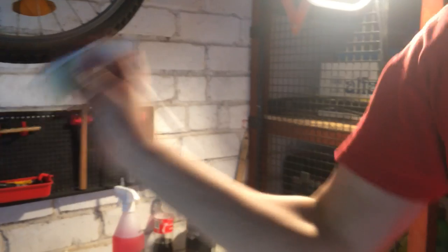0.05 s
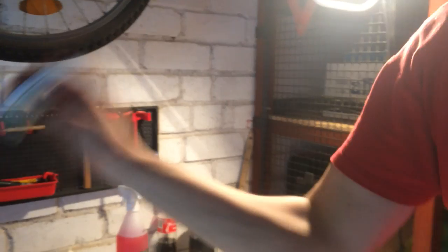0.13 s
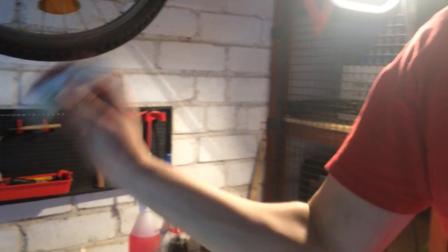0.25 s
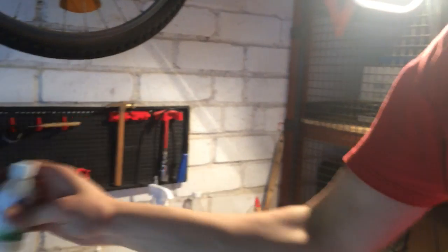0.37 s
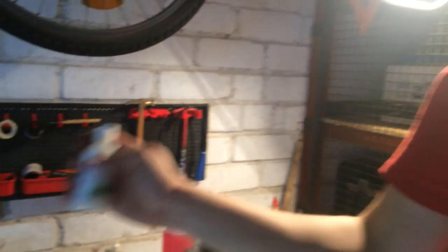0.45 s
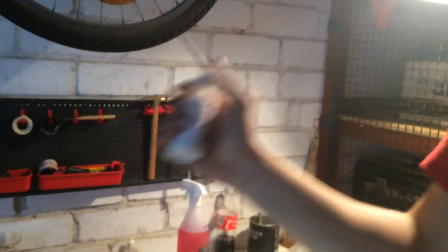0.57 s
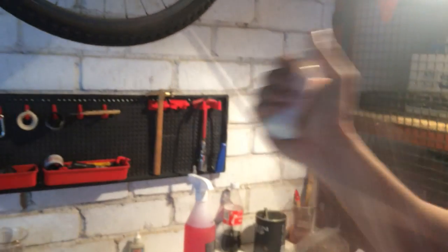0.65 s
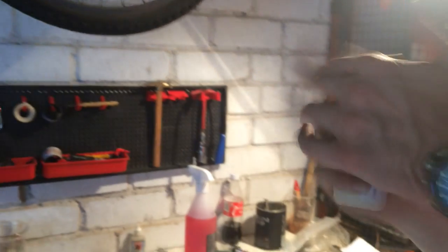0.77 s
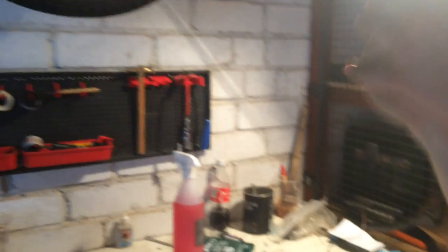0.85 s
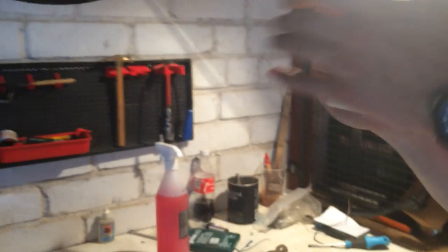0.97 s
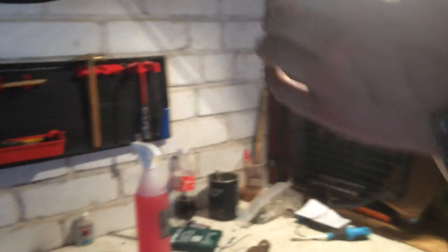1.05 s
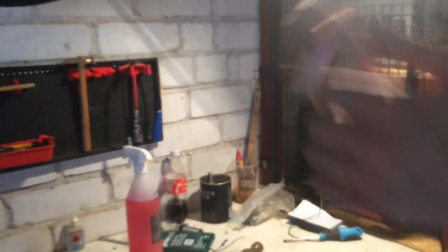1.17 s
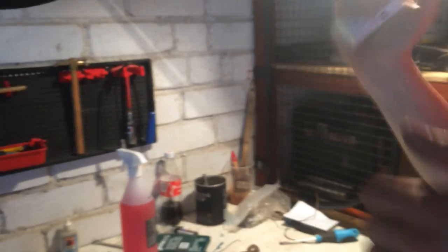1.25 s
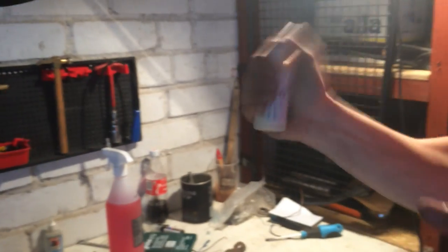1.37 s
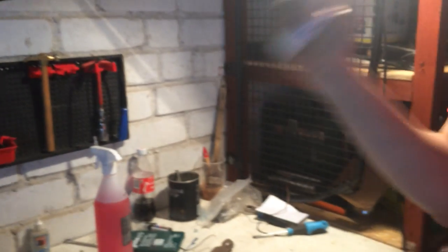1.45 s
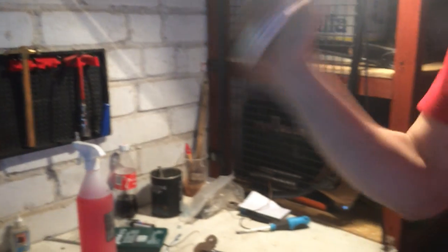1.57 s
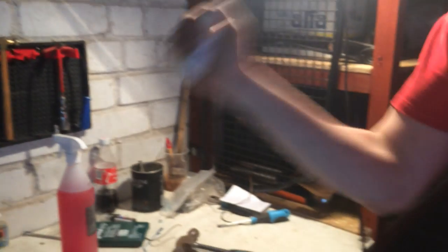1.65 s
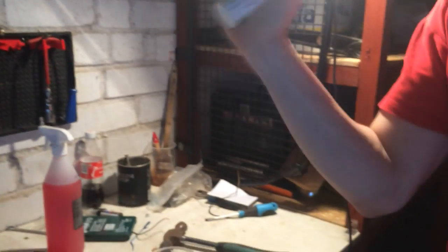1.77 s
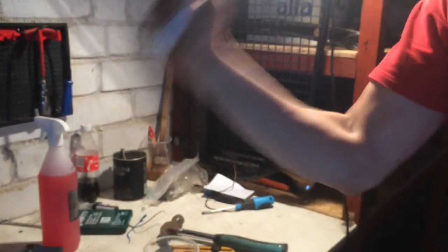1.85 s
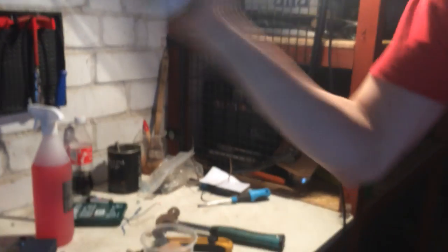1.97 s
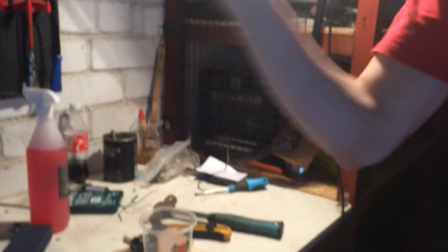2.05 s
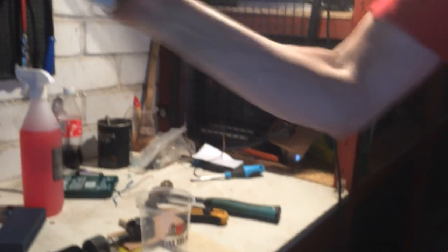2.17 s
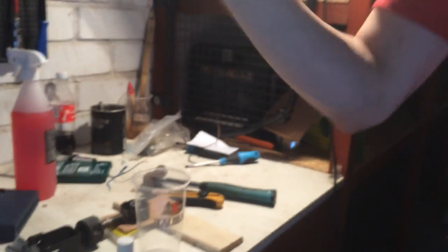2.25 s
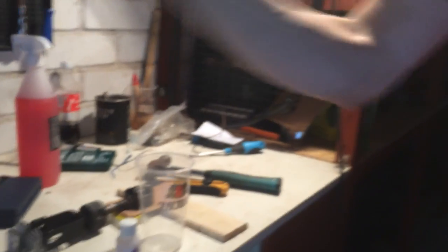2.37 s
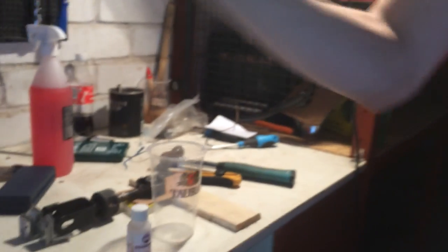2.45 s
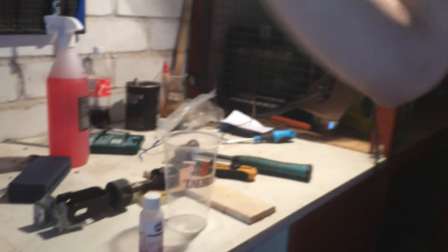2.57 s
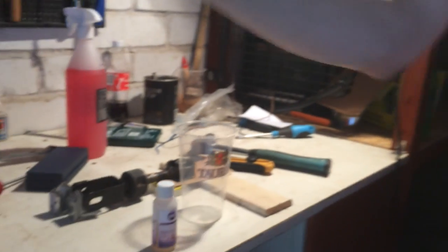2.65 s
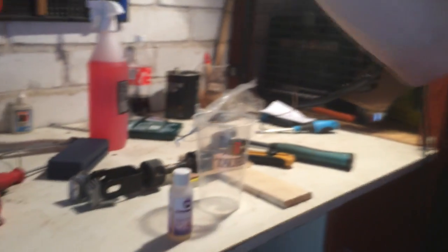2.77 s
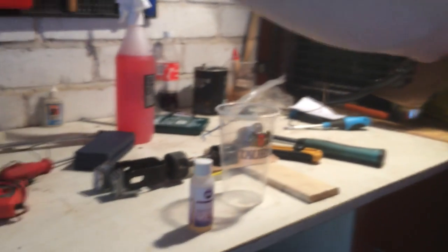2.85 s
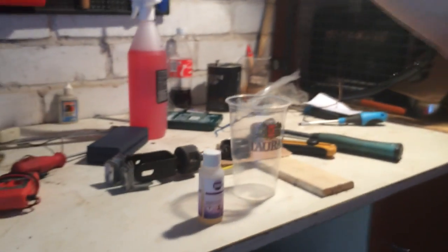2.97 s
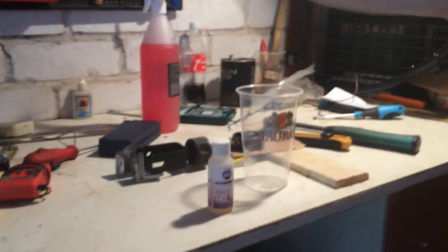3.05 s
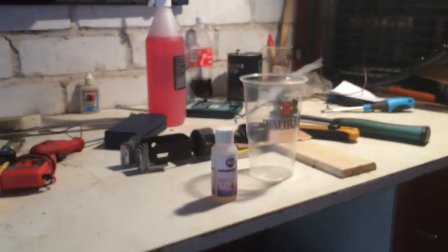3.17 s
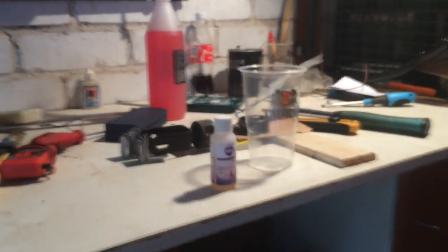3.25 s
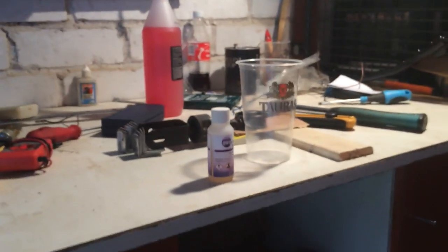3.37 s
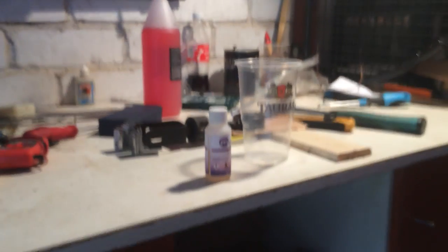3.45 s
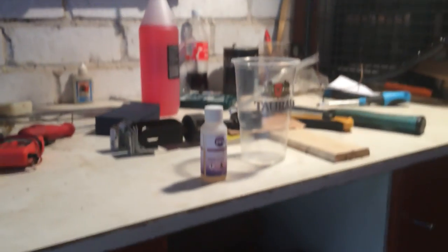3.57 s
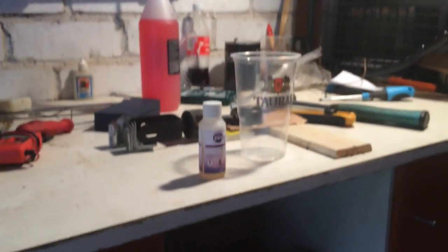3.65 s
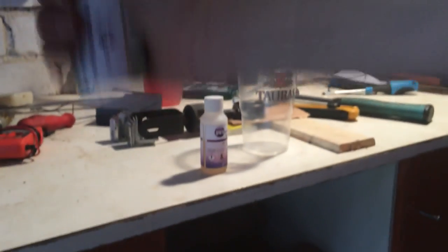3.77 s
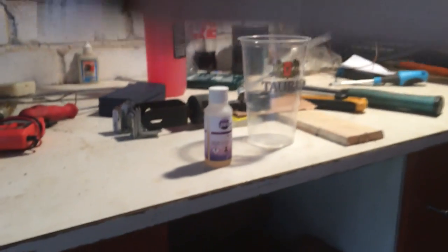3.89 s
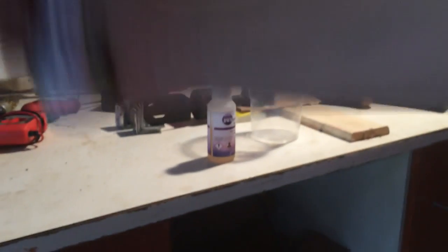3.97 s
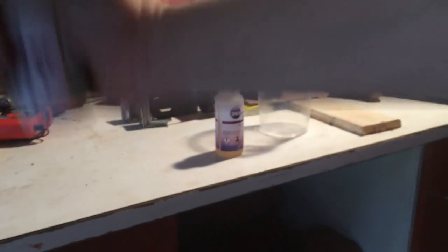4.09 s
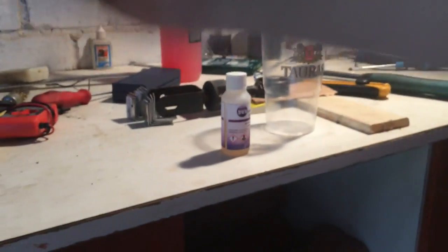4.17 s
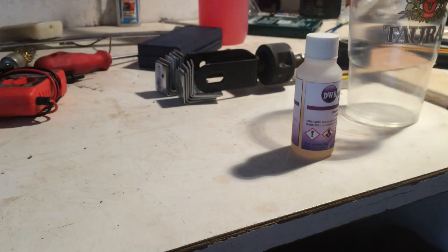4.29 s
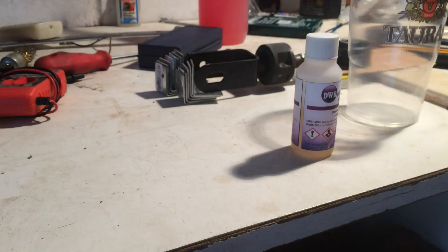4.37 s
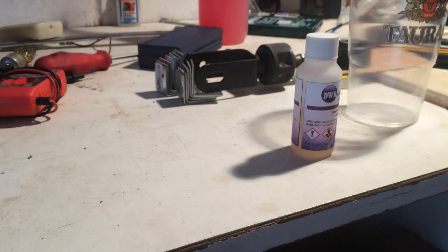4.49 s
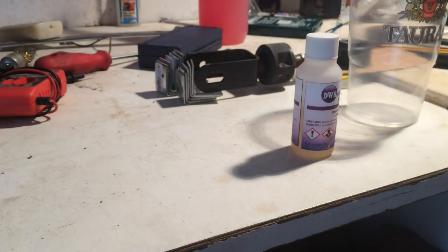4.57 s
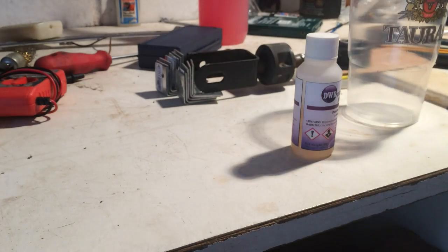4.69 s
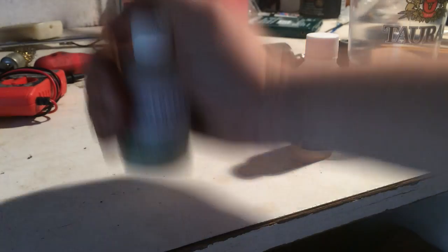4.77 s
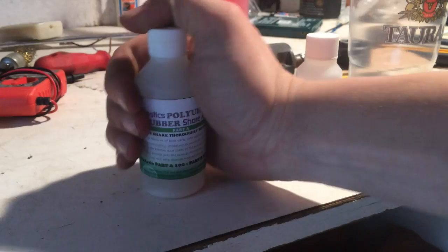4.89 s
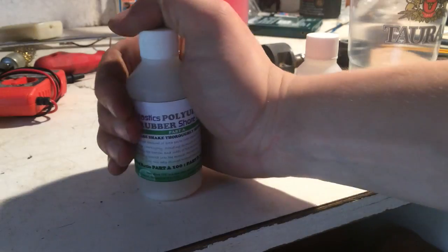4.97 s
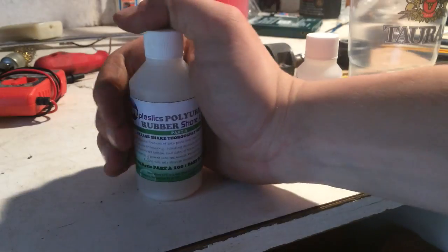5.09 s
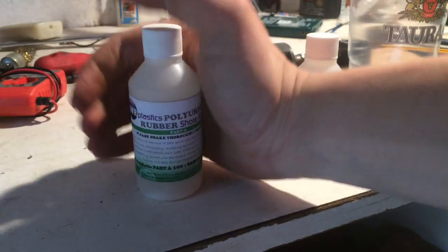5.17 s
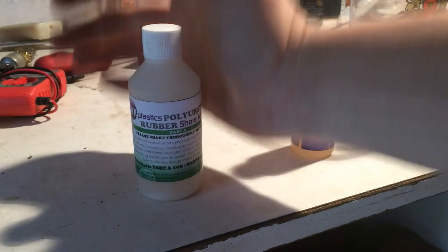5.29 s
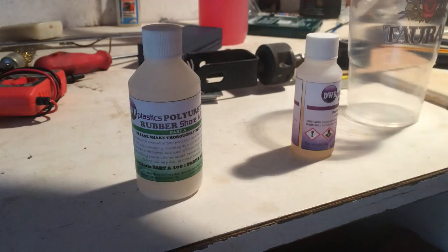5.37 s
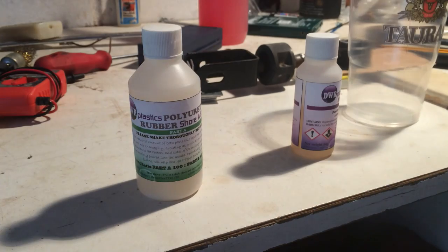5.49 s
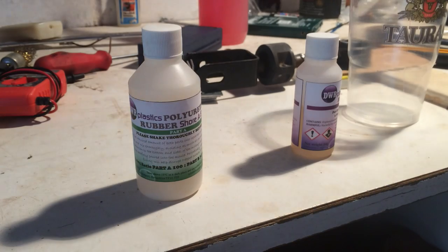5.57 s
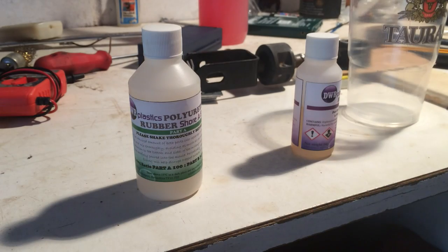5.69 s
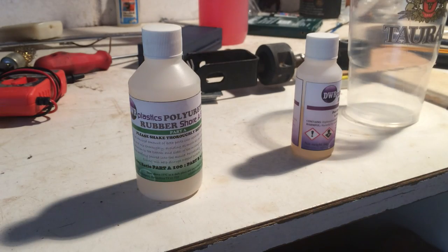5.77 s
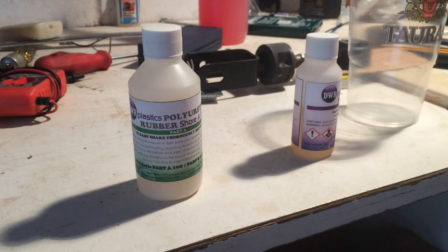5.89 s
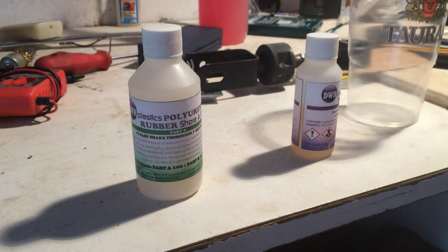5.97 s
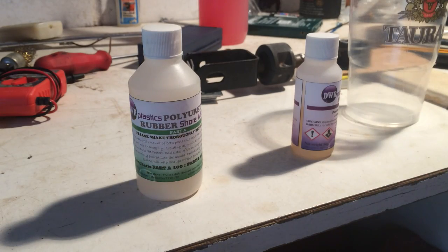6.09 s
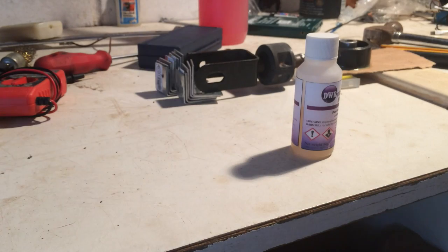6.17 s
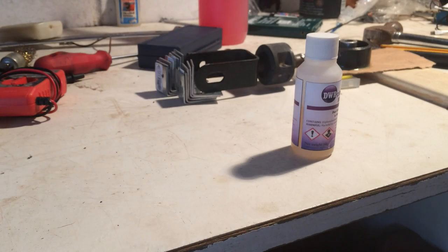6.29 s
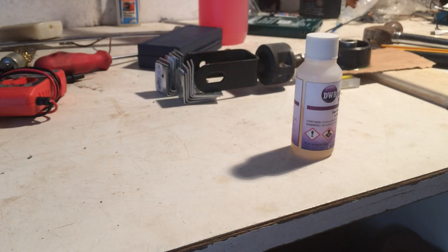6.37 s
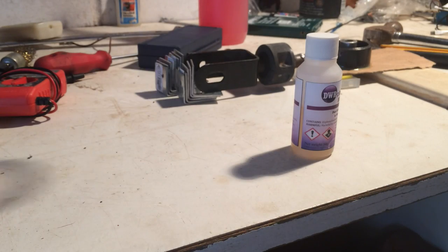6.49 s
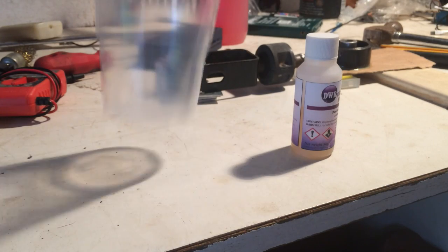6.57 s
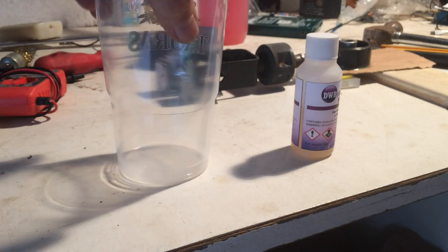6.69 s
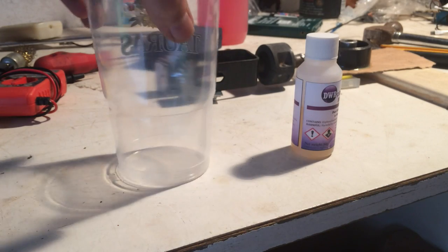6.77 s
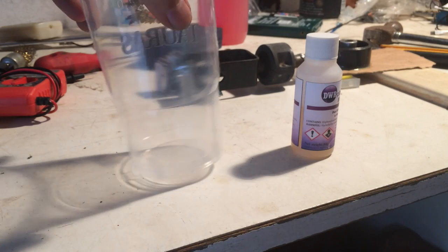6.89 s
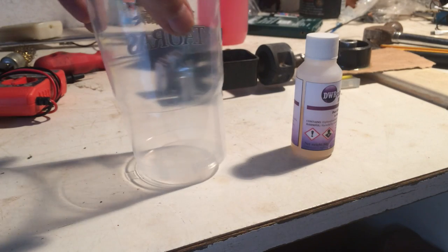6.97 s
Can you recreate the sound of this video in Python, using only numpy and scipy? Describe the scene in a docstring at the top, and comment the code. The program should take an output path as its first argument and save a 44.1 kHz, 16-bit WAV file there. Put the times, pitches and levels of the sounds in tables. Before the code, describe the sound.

Close to a wooden workbench in a small brick garage, light plastic is knocked, nudged and dragged in irregular bursts, with hollow taps, short hoarse scraping notes and small clicks. After a quieter stretch of faint ticks, a filled plastic bottle lands with by far the loudest thunk. Little finger clicks follow, then an empty tall cup is set down with a crisp hollow knock. Faint steady hiss and short room echo throughout.

```python
"""Plastic knocks, scrapes, clicks and rustles on a wooden bench in a garage, over a faint hiss.
Bottles and thin cups are handled, nudged, dragged and set down. Knocks ring damped modes of hollow,
walls and bench top; drags are stick-slip grit in resonances plus a wandering note; thumps are single
low modes; ticks, scuffs and rustle are shaped noise. Decaying noise bands give the room's echoes."""
import sys
import numpy as np
from scipy import signal
from scipy.fft import rfft, irfft
from scipy.io import wavfile

SR = 44100
rng = np.random.default_rng(int(sys.argv[2]) if len(sys.argv) > 2 else 0)


def pcm_store(signal):
    """Save signal as 16-bit PCM."""
    levels = np.round(np.clip(np.atleast_2d(signal), -1, 1) * 32767)
    wavfile.write(sys.argv[1], SR, levels.astype(np.int16).T)


N = 310464
RING = SR // 3  # samples

# Knocks of the light cup, the full bottle and the tall empty cup. Each row: start in seconds,
# hollow peak in dB, hollow pitch in Hz, walls peak in dB, bench peak in dB.
CUP_KNOCKS = [(0.568, -35, 420, -63, -74), (0.832, -37.5, 375, -33.5, -68), (0.846, -53, 655, -37, -53.5),
              (0.897, -51, 604, -38, -66), (0.992, -33.5, 571, -42.5, -56), (1.015, -51, 670, -46, -46),
              (1.151, -32.5, 850, -62, -64), (1.16, -17, 550, -17.5, -62), (1.191, -41, 604, -39, -33.5),
              (1.228, -23.5, 685, -30, -36.5), (1.355, -41.5, 550, -49, -47.5),
              (1.691, -39, 565, -40.5, -69.5), (1.7, -42.5, 564, -39, -65), (1.85, -41.5, 650, -37, -79),
              (1.945, -45, 563, -48, -40), (1.955, -21, 546, -21, -52), (1.99, -29.5, 580, -37, -41),
              (2.024, -30, 530, -42.5, -50), (2.382, -34, 790, -46, -45), (2.39, -20, 633, -20.5, -66),
              (2.43, -31.5, 390, -32, -43), (2.482, -29.5, 433, -26.5, -40.5), (2.534, -48, 700, -63, -73),
              (2.828, -25, 383, -28.5, -40), (2.851, -22.5, 650, -28, -34.5), (2.904, -37, 676, -50, -36),
              (2.932, -28, 686, -32, -43), (3.037, -23.5, 644, -34.5, -33.5), (3.466, -40, 530, -40, -51),
              (3.489, -23, 580, -31.5, -21), (3.513, -47, 670, -39, -53), (4.127, -46, 600, -69, -69),
              (4.536, -47, 860, -53.5, -61)]
BOTTLE_KNOCKS = [(4.8933, -7.5, 310, -3.5, -16.5), (4.9035, -3.5, 286, -12.5, -17.5),
                 (5.284, -32, 270, -43, -40.5), (5.503, -63, 300.8, -45.5, -60),
                 (6.133, -56, 345.7, -49, -48.5)]
TALL_CUP_KNOCKS = [(6.7675, -8.5, 594, -7, -48.5), (6.946, -29, 663, -41, -63)]

# Modes of walls and bench top. Each row: nominal frequency in Hz, relative level in dB, t60 in seconds.
CUP_WALLS = [(925, -0.5, 0.02), (1176, 1, 0.009), (1380, 0, 0.036), (1730, 3.5, 0.0082),
             (2040, -3.5, 0.023), (2480, -2, 0.0081), (3090, -3.5, 0.0078), (3350, -4.5, 0.011),
             (3750, -6.5, 0.011), (4480, -3, 0.0053), (5460, -4, 0.011), (6670, -3, 0.0016)]
BOTTLE_WALLS = [(473, -5, .05), (554, -4, .05), (669, 1, 0.15), (740, 2, 0.04), (920, -5, .025),
                (1240, 2, .01), (1500, 3, .012), (1803, 2.5, 0.027), (2130, 4.5, 0.011),
                (2400, 4.5, 0.0087), (2750, 0, 0.021), (3250, 8.5, .005), (3950, 5, .006),
                (4770, 1.5, .005)]
TALL_CUP_WALLS = [(316, -7, 0.03), (414, -3, 0.015), (830, -2.5, 0.005), (1085, 4, 0.0057),
                  (1754, -10, 0.013), (3240, -2, 0.0063), (4730, -28, 0.0051), (6050, -9, 0.0018)]
BENCH = [(45.3, -8, 0.12), (74, 0.5, 0.16), (101, 3.5, .22), (131, -1, 0.18), (158, -5.5, 0.023),
         (197.5, -7.5, 0.39), (263, -6, 0.26), (301, -10, 0.14), (400, -7, 0.45)]
CHATTER_GROWTH = .12  # harder blows chatter longer: dB of length per dB of blow

# Cup sliding on the bench. Each row: start in seconds, attack in ms, hold in ms, cup level in dB,
# bench top level in dB, share that sings in the hollow (0-1).
DRAGS = [(0.53, 55, 5, -50, -58, 0), (0.997, 8, 8.3, -38, -57, 0.54), (1.163, 2.2, 23, -35.5, -38.5, .2),
         (1.224, 4.3, 32.4, -45, -51.5, 0.13), (1.57, 16, 55, -56, -81, 0.57),
         (1.96, 5, 106.4, -40.5, -48, 0.91), (2.395, 3.5, 147, -42.5, -52.5, 0.84),
         (2.58, 30, 54, -55.5, -65, 0.82), (2.66, 26, 23, -47.5, -76, 0.93),
         (2.705, 83, 28, -36.5, -56, .97), (2.825, 7.1, 80, -36.5, -35, 0.77),
         (2.92, 12, 50, -74, -43.5, 0.5), (3.039, 2.3, 8.5, -49, -35.5, 1),
         (3.09, 19, 90, -50.5, -45.5, 0.34), (3.25, 17, 96, -59, -53.5, 0.18),
         (3.493, 4.3, 30, -49, -42, 0.54), (5.284, 6.1, 36, -62.5, -45.5, 0),
         (5.701, 18, 95, -68.5, -74, 1), (6.779, 2.9, 9.4, -43.5, -44, 0.5), (6.81, 5, 120, -58, -64, 0.02)]
# Resonances of the singing hollow, rattling rim and buzzing bench top.
# Each row: frequency in Hz, width in Hz, relative level in dB.
DRAG_COLOUR = [(676.4, 18.3, 4.5), (522, 360, -3.5), (430, 33, -29), (1290, 900, -7)]
DRAG_RATTLE = [(454, 67, 19), (600, 270, 16), (1180, 170, 6.5), (1760, 690, -43.5), (4120, 1800, -29.5)]
BENCH_BUZZ = [(181, 35, 2.5), (138.5, 16, -13.5), (293, 130, -9)]
CUP_RELEASE_MS, TOP_RELEASE_MS, DRAG_WAVER_RMS_DB = 23, 21.2, 2
# Slips lock to the hollow and hold its note; SING_DB is relative to the singing grit.
SING_HZ, SING_WANDER_RMS_HZ, SING_DB = 696, 25.1, -1.5

# Dull thumps of wrist and bench frame. Each row: start in seconds, peak in dB, frequency in Hz.
THUMPS = [(0.832, -37, 89), (1.166, -39, 65), (1.387, -50.5, 86), (1.885, -54.5, 76.6), (1.96, -45, 60),
          (2.831, -37, 143), (3.043, -39, 143), (3.256, -37, 73.5), (3.327, -35, 71), (3.493, -22, 79),
          (3.542, -32, 74.4), (3.945, -52.5, 124), (4.88, -38, 200), (5.15, -41.5, 100)]
THUMP_CYCLES = 5.9  # until 60 dB down

# Small clicks of fingers and plastic. Each row: start in seconds, peak in dB, frequency in Hz.
TICKS = [(0.512, -43, 7000), (1.1778, -43, 6960), (1.191, -39, 6500), (1.016, -31, 3120),
         (1.4184, -40, 5500), (1.701, -32.5, 6350), (1.7638, -44.5, 2000), (2.2035, -47.5, 4970),
         (3.1425, -39, 8050), (3.497, -27.5, 6000), (3.5069, -23, 6940), (3.514, -17, 2130),
         (3.528, -37, 2500), (3.579, -40, 5100), (3.626, -36.5, 1870), (3.965, -51, 1170),
         (4.0675, -41.5, 1640), (4.199, -52, 1180), (4.2374, -44.5, 4450), (4.388, -47.5, 5370),
         (4.414, -42, 3640), (4.464, -48, 2440), (4.870, -51, 3270), (5.113, -48, 3070),
         (5.1743, -46, 3030), (5.2102, -58, 2040), (5.2666, -38, 3380), (5.383, -43.5, 2400),
         (5.4312, -45.5, 2390), (5.477, -40, 2390), (5.506, -26.5, 2320), (5.7651, -46, 2240),
         (5.8592, -49, 3136), (6.116, -46, 4000), (6.884, -36.5, 4500), (6.893, -43, 7400),
         (6.936, -50, 6000), (6.957, -38, 9000)]

# Skin and cloth brushing past. Each row: peak time in seconds, rise in ms, fall in ms, level in dB,
# centre in Hz, fizz in dB relative to the broad band.
SCUFFS = [(0, 0.85, 29, -50.5, 2080, -10), (0.576, 96, 103, -58, 2160, -2),
          (0.838, 3.6, 40, -51.5, 1960, 4.5), (1.023, 18, 30, -46.5, 3100, -6.5),
          (1.62, 25, 57, -60, 1250, -4.5), (2.839, 9.2, 11, -41.5, 3300, -33),
          (2.92, 11, 11, -50, 1350, -22), (3.188, 12, 18, -40, 3680, -22), (3.489, 38, 125, -55, 4070, -13),
          (5.512, 22, 23, -56.5, 2160, -7.5), (6.07, 40, 30, -62.5, 3000, -11),
          (6.139, 16.4, 22, -50.5, 3630, -9.5), (6.67, 34, 21, -64, 1800, -23),
          (6.949, 5.5, 5.7, -35.5, 2960, -17.5)]

# Handling levels, interpolated. Each row: time in seconds, bench rumble in dB, hand rustle in dB.
HANDS = [(0.0, -59.5, -64), (0.29, -82, -73.5), (0.84, -68, -74), (1.19, -53.5, -61), (1.62, -77, -70),
         (2.39, -85, -75.5), (2.59, -64, -67), (2.8, -53, -67), (3.02, -53.5, -65), (3.47, -60, -67),
         (3.73, -68, -75), (4.04, -72.5, -76.5), (4.86, -75, -76), (5.02, -48.5, -69), (5.16, -57, -71),
         (5.8, -70.5, -74), (6.63, -70.5, -78.5), (7.04, -66, -76)]
# Rustle resonances. Each row: frequency in Hz, width in Hz, relative level in dB.
RUSTLE_COLOUR = [(1880, 970, 18), (3430, 1500, 5), (9200, 22000, -5)]

# Echo bands. Each row: low edge in Hz, high edge in Hz, t60 in seconds, level in dB.
ROOM = [(41, 270, 0.52, -46), (389, 1900, 0.63, -57.5), (1405, 2600, .4, -50), (2600, 3700, .25, -57.5),
        (4800, 8000, 0.3, -53.5)]

# Background spectrum. Each row: frequency in Hz, relative density in dB per Hz.
AIR = [(15, -33.5), (25, -2), (101, -2), (703, -8.5), (1300, -15), (2010, -22), (11500, -25.5),
       (14300, -30.5), (15500, -31)]
AIR_RMS_DB = -67

TOP_HZ = 15500


def knocks(table, walls, hollow_t60_s, push_ms, tip_hz, chatter_ms_at_0db, chatter_db, crack_db,
           rattle_db, rattle_t60_s):
    """A blow, then the rim chatters and clutter rattles on; walls take it sharp, hollow and bench softer."""
    out = np.zeros(N)
    push = np.hanning(int(push_ms * SR / 1000) + 3)
    impulse = signal.unit_impulse(RING)
    rattle_peaks = [(504, 440, 3.5), (1700, 1500, 2.5), (3500, 1500, -7.5)]
    for start_s, hollow_db, hollow_hz, walls_db, bench_db in table:
        chatter_noise, rattle_noise = rng.standard_normal((2, RING))
        walls_luck, bench_luck = rng.standard_normal((2, 16))

        chatter_ms = max(chatter_ms_at_0db * amp(CHATTER_GROWTH * walls_db), .2)  # time constant
        chatter = chatter_noise * fade(chatter_ms * np.log(1000) / 1000)
        sharp = band((amp(chatter_db) * chatter + impulse)[:SR // 4], 150, tip_hz)
        soft = np.convolve((0.11 * chatter + impulse)[:SR // 4], push)

        hollow = ring([(hollow_hz, 0, hollow_t60_s)])
        add(out, start_s, signal.fftconvolve(soft, hollow), hollow_db)
        add(out, start_s, signal.fftconvolve(sharp, ring(walls, walls_luck)), walls_db)
        add(out, start_s, signal.fftconvolve(soft, ring(BENCH, bench_luck)), bench_db)
        add(out, start_s, band(chatter, 5000, 10000), walls_db + crack_db)

        dull = band(resonances(rattle_noise, rattle_peaks), 200, 4500) * fade(rattle_t60_s)
        # the treble dies first
        bright = amp(-16) * band(rattle_noise, 3000, 11000) * fade(0.47 * rattle_t60_s)
        add(out, start_s, dull + bright, walls_db + rattle_db)
    return out


def ring(modes, luck=None):
    """Impulse response of damped modes; luck (the spot of the blow) varies share and tuning."""
    t = np.arange(RING) / SR
    luck = np.zeros(len(modes)) if luck is None else luck
    # neighbouring modes swing in opposite senses, which fills the valleys between them
    share = amp(2 * luck) * (-1) ** np.arange(len(luck))
    detune = 1 + .006 * luck
    body = np.zeros(RING)
    for (hz, db, t60_s), gain, ratio in zip(modes, share, detune):
        body += amp(db) * gain * fade(t60_s) * np.sin(2 * np.pi * hz * ratio * t)
    return band(body, .5 * modes[0][0], 3 * modes[-1][0])  # little radiates below the lowest


def drags():
    """The rough bench makes the sliding cup sing in its hollow or rattle on its rim, and the top buzz."""
    gain = np.zeros((3, N))
    for start_s, attack_ms, hold_ms, cup_db, top_db, sing in DRAGS:
        cup = amp(cup_db) * stroke(start_s, attack_ms, hold_ms, CUP_RELEASE_MS)
        top = amp(top_db) * stroke(start_s, attack_ms, hold_ms, TOP_RELEASE_MS)
        sing = np.clip(sing, 0, 1)
        gain += [np.sqrt(sing) * cup, np.sqrt(1 - sing) * cup, top]

    waver = amp(DRAG_WAVER_RMS_DB * unit(band(rng.standard_normal(N), 10.6, 32.7)))
    note_hz = SING_HZ + SING_WANDER_RMS_HZ * unit(band(rng.standard_normal(N), 4.4, 40))
    note = amp(SING_DB) * np.sin(2 * np.pi * np.cumsum(note_hz) / SR)

    singing_grit = unit(band(resonances(grit(600, 2.8), DRAG_COLOUR), 580, 1000))
    hollow = unit(singing_grit + note)
    rim = unit(band(resonances(grit(500, 2.6), DRAG_RATTLE), 340, 6630))
    top = unit(band(resonances(grit(200, 6.0), BENCH_BUZZ), 118, 426))
    return waver * np.sum(gain * [hollow, rim, top], axis=0)


def stroke(start_s, attack_ms, hold_ms, release_ms):
    """Pressure builds as a square law, holds, then lets go exponentially."""
    ms = 1000 * (np.arange(N) / SR - start_s)
    build = np.clip(ms / max(attack_ms, 1), 0, 1) ** 2
    return build * np.exp(-np.maximum(ms - attack_ms - hold_ms, 0) / release_ms)


def grit(slips_per_s, spread_db):
    """Stick-slip: random slips of unequal size, spread capped, over a bed of fine ones."""
    hits = rng.random(N) < slips_per_s / SR
    size = amp(spread_db * np.minimum(rng.exponential(size=N), 2.5))
    slips = hits * size * rng.standard_normal(N)
    return unit(unit(slips) + rng.standard_normal(N))


def thumps():
    """One low, heavily damped mode each."""
    out = np.zeros(N)
    for start_s, db, hz in THUMPS:
        add(out, start_s, ring([(hz, 0, THUMP_CYCLES / hz)]), db)
    return out


def ticks():
    """Each click is a few milliseconds of decaying noise in one broad resonance."""
    out = np.zeros(N)
    for start_s, db, hz in TICKS:
        snap = (rng.standard_normal(RING) * fade(0.0027))[:2048]
        click = resonances(snap, [(hz, .6 * hz, 0)])
        add(out, start_s, band(click, .25 * hz, min(3 * hz, 12000)), db)
    return out


def scuffs():
    """Skin and cloth catch on fine grain: swells of a broad band plus a bright fizz."""
    t = np.arange(N) / SR
    out = np.zeros(N)
    grain = grit(1300, 5.8)
    for peak_s, rise_ms, fall_ms, db, hz, fizz_db in SCUFFS:
        near = slice(max(int((peak_s - .3) * SR), 0), int((peak_s + .4) * SR))
        ms = 1000 * (t[near] - peak_s)
        swell = np.where(ms < 0, np.exp(-(ms / rise_ms) ** 2), np.exp(-np.abs(ms) / fall_ms))
        broad = unit(band(grain[near], 0.44 * hz, 1.75 * hz))
        fizz = amp(fizz_db) * unit(band(grain[near], 5100, 10400))
        out[near] += amp(db) * swell * (broad + fizz)
    return out


def hands():
    """The bench rumbles under the arms, sleeves rustle: grit through broad resonances."""
    time_s, *columns = np.transpose(HANDS)
    rumble_db, rustle_db = (np.interp(np.arange(N) / SR, time_s, c) for c in columns)
    bench_peaks = [(hz, 0.34 * hz, db) for hz, db, _ in BENCH]
    rumble = unit(band(resonances(grit(42, 1.5), bench_peaks), 22, 900))
    rustle = unit(resonances(grit(4900, 3.7), RUSTLE_COLOUR))
    return amp(rumble_db) * rumble + amp(rustle_db) * rustle


def garage(x):
    """Dense echoes of brick and clutter after 6 ms; each band of noise dies at its own rate."""
    size = SR // 2
    echoes = np.zeros(size)
    for low_hz, high_hz, t60_s, db in ROOM:
        echoes += amp(db) * band(rng.standard_normal(size), low_hz, high_hz) * fade(t60_s, size)
    return signal.fftconvolve(x, np.r_[np.zeros(int(.006 * SR)), echoes])[:N]


def air():
    """Steady hiss and distant rumble: noise shaped in its spectrum."""
    hz, db = np.transpose(AIR)
    log_hz = np.log(np.fft.rfftfreq(N, 1 / SR) + 1)  # +1 avoids log of zero
    shape = amp(np.interp(log_hz, np.log(hz), db))
    return amp(AIR_RMS_DB) * unit(irfft(rfft(rng.standard_normal(N)) * shape, N))


def amp(db):
    """Decibels to gain."""
    return 10 ** (np.asarray(db) / 20)


def unit(x):
    """Scale to rms 1."""
    return x / np.sqrt(np.mean(x ** 2))


def fade(t60_s, size=RING):
    """Exponential fall, 60 dB in t60_s."""
    return np.exp(-np.log(1000) * np.arange(size) / SR / t60_s)


def band(x, low_hz, high_hz):
    """Band-pass, 12 dB per octave on each side."""
    return signal.sosfilt(signal.butter(2, [low_hz, high_hz], "bandpass", fs=SR, output="sos"), x)


def resonances(x, peaks):
    """Parallel resonances from rows of Hz, width in Hz, dB."""
    return sum(amp(db) * signal.lfilter(*signal.iirpeak(hz, hz / width_hz, SR), x)
               for hz, width_hz, db in peaks)


def add(out, start_s, sound, peak_db):
    """Place a sound at start_s with its peak at peak_db."""
    i = int(start_s * SR)
    out[i:i + len(sound)] += (sound * amp(peak_db) / np.abs(sound).max())[:N - i]


def scene():
    """Everything on the bench, its echoes and the air."""
    cup = knocks(CUP_KNOCKS, CUP_WALLS, hollow_t60_s=0.022, push_ms=.4, tip_hz=12000,
                 chatter_ms_at_0db=7.6, chatter_db=-8, crack_db=-34, rattle_db=-12, rattle_t60_s=0.14)
    tall_cup = knocks(TALL_CUP_KNOCKS, TALL_CUP_WALLS, hollow_t60_s=0.025, push_ms=0.087, tip_hz=6050,
                      chatter_ms_at_0db=0.88, chatter_db=-14.5, crack_db=-31,
                      rattle_db=-15.5, rattle_t60_s=0.09)
    bottle = knocks(BOTTLE_KNOCKS, BOTTLE_WALLS, hollow_t60_s=0.045, push_ms=.45, tip_hz=12000,
                    chatter_ms_at_0db=2.8, chatter_db=-5, crack_db=-12.5,
                    rattle_db=-15.5, rattle_t60_s=0.19)
    near = cup + tall_cup + bottle + drags() + thumps() + ticks() + scuffs() + hands()
    return (near + garage(near) + air())[None]


def record(dry):
    """Peaks beyond 0.9 clip; a steep low-pass then cuts the top."""
    low_pass = signal.ellip(10, .2, 80, TOP_HZ, fs=SR, output="sos")
    return signal.sosfilt(low_pass, np.clip(dry, -.9, .9))


dry = scene()
out = record(dry)
pcm_store(out)
```